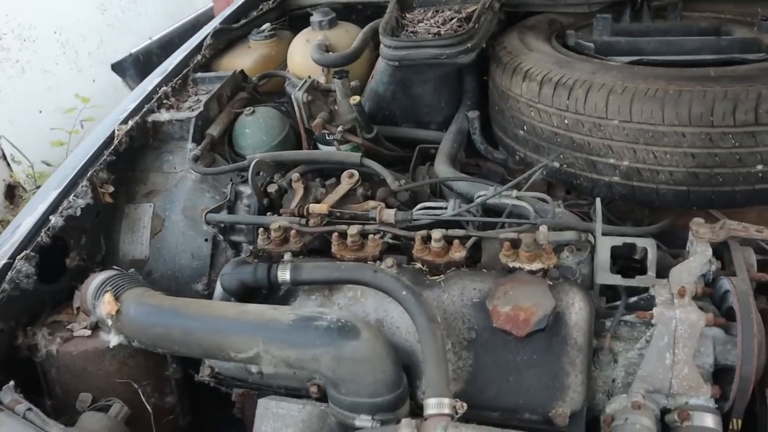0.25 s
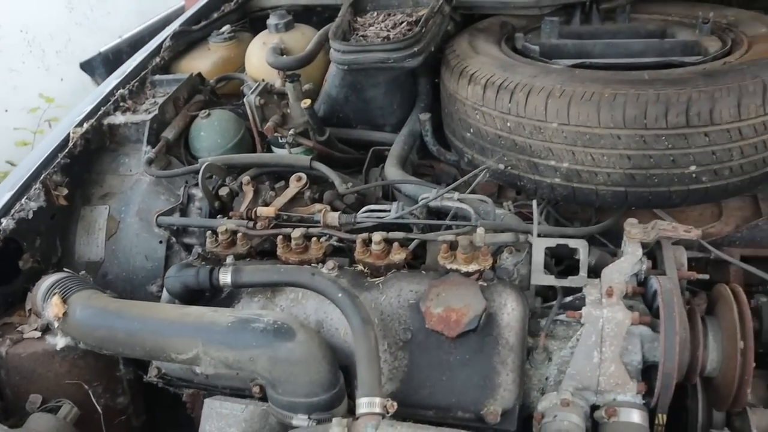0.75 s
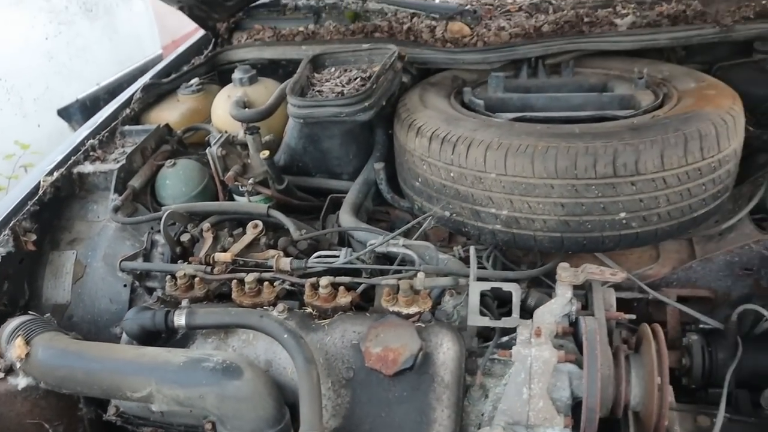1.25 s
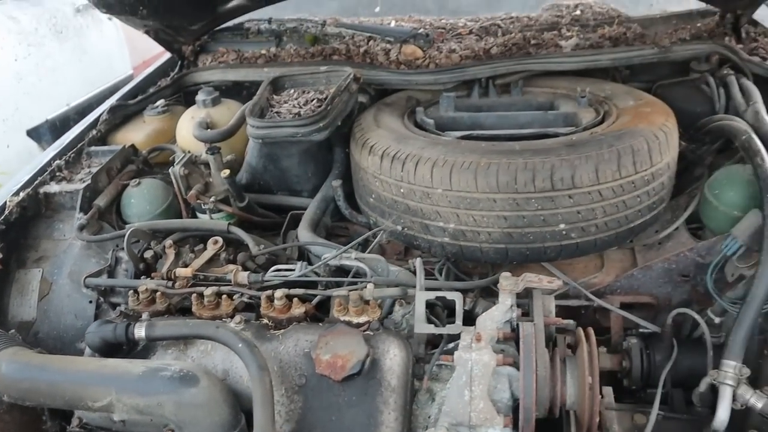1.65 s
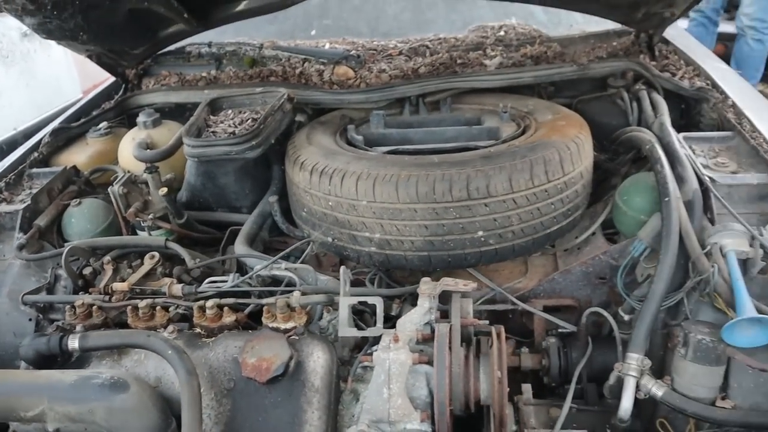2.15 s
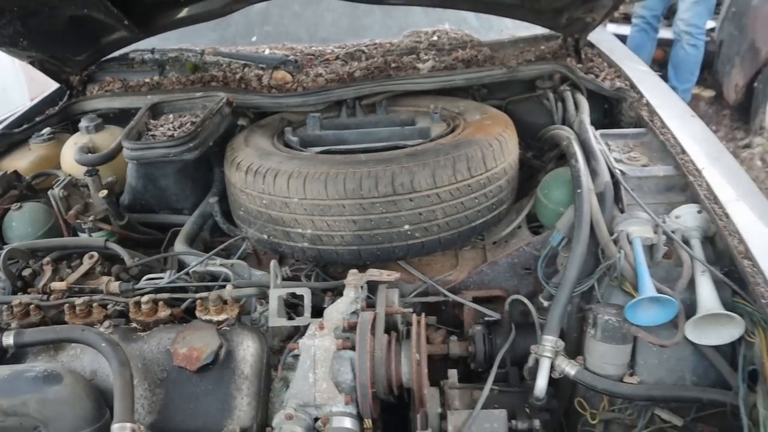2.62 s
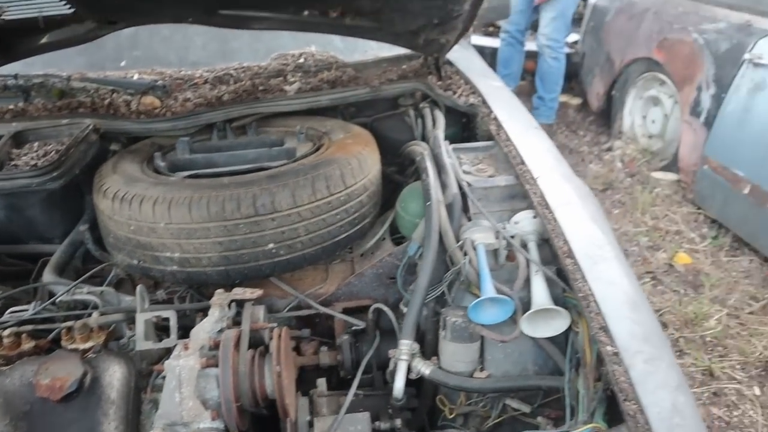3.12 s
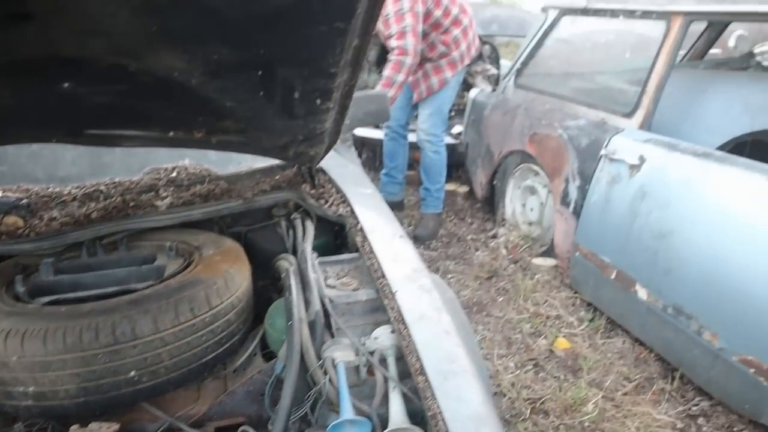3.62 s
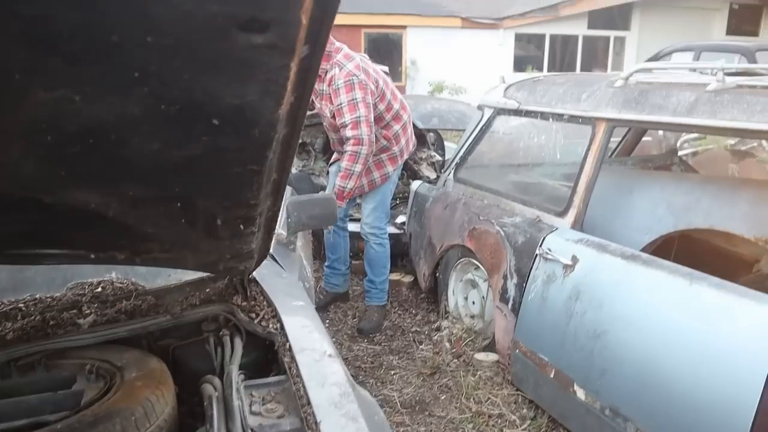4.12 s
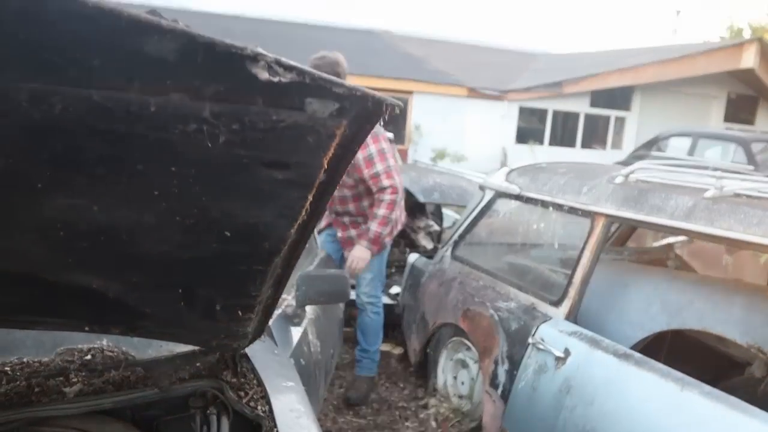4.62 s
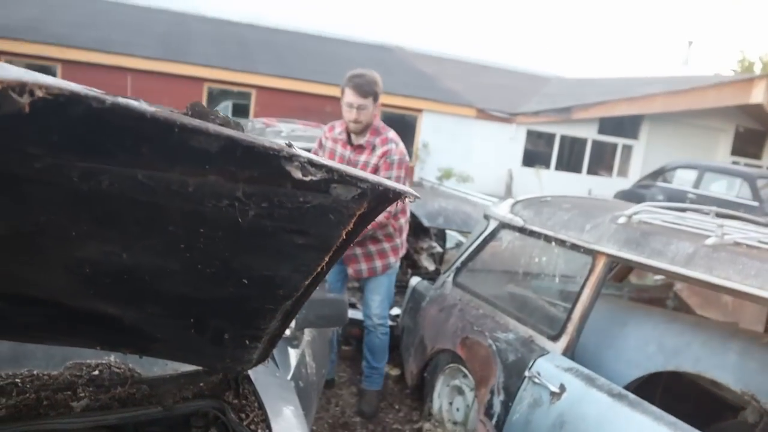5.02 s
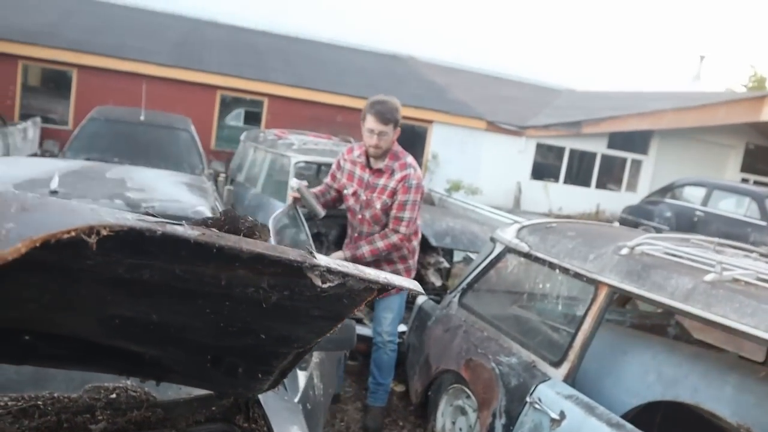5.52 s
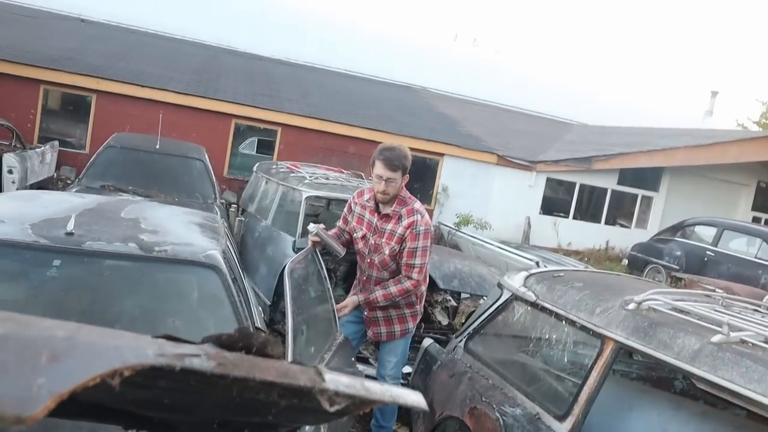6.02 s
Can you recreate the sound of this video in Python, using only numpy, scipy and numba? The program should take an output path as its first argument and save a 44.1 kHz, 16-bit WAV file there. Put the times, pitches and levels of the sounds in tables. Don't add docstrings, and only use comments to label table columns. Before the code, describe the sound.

Uneven bursts of hollow sheet-metal thumps and loose latch clatter, heard at a few metres in an open yard. After the strong opening tugs the contacts become small and quiet, a hinge chirps once, and a distant bird whistles downward. A second rattling boom comes, then dry stalks crunch under a dragging shoe and the door knocks again. Soft distant traffic continues throughout, with the recording level dipping after loud clunks.

```python
import sys
import numpy as np
from scipy import signal
from scipy.fft import rfft, irfft
from scipy.io import wavfile
from scipy.ndimage import uniform_filter1d
from numba import njit

SR = 44100
rng = np.random.default_rng(int(sys.argv[2]) if len(sys.argv) > 2 else 0)


def boost(x):
    u = np.asarray(x, float) / 20
    return 10 ** u


def unload_wav(signal):
    wavfile.write(
        sys.argv[1],
        SR,
        np.round(np.clip(np.atleast_2d(signal).T, -1, 1) * 32767).astype(np.int16),
    )


N = 276066


def band(x, lo_hz, hi_hz):
    edges = np.clip([lo_hz, hi_hz], 20, .45 * SR)
    return signal.lfilter(*signal.butter(2, edges, "band", fs=SR), x + 1e-18)


def ring(x, hz, t60_s):
    radius = np.exp(-np.log(1000) / (max(t60_s, .002) * SR))
    angle = 2 * np.pi * hz / SR
    return signal.lfilter([.5, 0, -.5], [1, -2 * radius * np.cos(angle), radius * radius], x)


def add(out, start_s, sound, peak_db):
    i = int(start_s * SR)
    top = np.sqrt(2 * uniform_filter1d(sound ** 2, size=88).max())
    out[i:i + len(sound)] += (boost(peak_db) / top * sound)[:N - i]


def walk(rate_hz):
    hold = int(SR / rate_hz)
    steps = np.repeat(rng.standard_normal(N // hold + 1), hold)
    return uniform_filter1d(uniform_filter1d(steps, hold), hold)[:N]


def grit(count, spread_db):
    return rng.standard_normal(count) * boost(spread_db * np.minimum(rng.exponential(size=count), 5))


# frequency in Hz, level in dB per Hz.
TOWN_COLOUR = [(12, -31), (22, -2), (49, 0), (119, -6), (520, -11.5), (930, -4), (3270, -26), (15600, -35)]
# frequency in Hz, width in Hz, lift in dB.
ENGINE_DRONES = [(225, 50, 6), (417, 51, 4)]


def town():
    hz = np.maximum(np.fft.rfftfreq(N, 1 / SR), 1)
    colour_hz, colour_db = np.transpose(TOWN_COLOUR)
    colour = boost(np.interp(np.log(hz), np.log(colour_hz), colour_db))
    colour = colour * boost(sum(db * np.exp(-((hz - f) / w) ** 2) for f, w, db in ENGINE_DRONES))
    wide = rfft(rng.standard_normal(N)) * colour
    swell = walk(0.13)
    out = 0
    for octave in np.arange(4, 15):
        share = np.clip(1 - np.abs(np.log2(hz) - octave), 0, 1)
        sway = np.clip(1.3 - octave / 11, 0, 1)
        out = out + irfft(wide * share, N) * boost(sway * (1.5 * swell + 2.5 * walk(5)))
    return out / out.std() * boost(-43)


def whistle(table):
    s, hz, db = np.transpose(table)
    t = np.arange(N) / SR
    level = boost(np.interp(t, s, db, -140, -140) + 6.2 * walk(45))
    pitch_hz = np.interp(t, s, hz) * (1 + 0.00665 * walk(71))
    return np.sqrt(2) * level * np.sin(2 * np.pi * np.cumsum(pitch_hz) / SR)


# time in seconds, pitch in Hz, level in dB.
SQUEAL_GLIDE = [
    (2.69, 11700, -95),
    (2.712, 11960, -64),
    (2.73, 11950, -65),
    (2.77, 11800, -76),
    (2.8, 12080, -72),
    (2.84, 11950, -72),
    (2.865, 11500, -95),
]


def squeal():
    return whistle(SQUEAL_GLIDE)


# time in seconds, pitch in Hz, level in dB.
BIRD_GLIDE = [
    (3.7, 3400, -85),
    (3.74, 3300, -68),
    (3.88, 3180, -65),
    (3.97, 3100, -64),
    (4.04, 2970, -62),
    (4.15, 2930, -66),
    (4.18, 2920, -90),
]


def bird():
    return whistle(BIRD_GLIDE)


# time in seconds, level in dB.
SHOE_PRESSURE = [
    (4.814, -52),
    (4.84, -53.5),
    (4.886, -45.5),
    (5.02, -52.5),
    (5.035, -41.5),
    (5.158, -40.5),
    (5.175, -53),
    (5.43, -63),
    (5.45, -73),
]
# centre in Hz, width in Hz, level in dB.
CRACKLE_BANDS = [(3700, 5500, 6.5), (8160, 1600, 9), (12750, 3400, 4.5)]


def grass():
    s, db = np.transpose(SHOE_PRESSURE)
    first, last = int(s[0] * SR), int(s[-1] * SR)
    crackle = 0
    for hz, width, gain_db in CRACKLE_BANDS:
        layer = band(grit(count=last - first, spread_db=5), hz - width / 2, hz + width / 2)
        crackle = crackle + boost(gain_db) * band(layer, .4 * hz, 1.6 * hz)
    pressure_db = np.interp(np.arange(first, last) / SR, s, db) + 2.7 * walk(70)[first:last]
    out = np.zeros(N)
    out[first:last] = crackle / crackle.std() * boost(pressure_db)
    return out


# start in seconds, peak in dB, pitch in Hz.
STALK_SNAPS = [(0.0576, -43, 7100), (0.1252, -45, 7100), (0.226, -45, 4080), (0.331, -45, 4200),
               (0.358, -48, 4230), (0.3727, -48, 4600), (0.4087, -45.5, 6500), (0.845, -48, 6350),
               (1.483, -52, 9900), (1.552, -40, 7500), (1.559, -37, 9500), (1.572, -35, 13000),
               (3.1077, -45, 5420), (3.14, -50, 7350), (4.777, -40, 8500), (4.836, -36, 13000),
               (4.991, -39, 7910), (5.0959, -39, 8200), (5.1034, -43, 7760), (5.1346, -35, 4160),
               (5.2364, -44, 12500), (5.1536, -31, 13500), (5.153, -40, 8700), (5.3294, -48, 4210),
               (5.9397, -40, 7340), (6.0482, -44, 8500), (6.0643, -42, 5770), (6.1003, -46, 8300),
               (6.1703, -34.5, 7850)]


def snaps():
    out = np.zeros(N)
    for s, db, hz in STALK_SNAPS:
        snap = rng.standard_normal(441) * np.exp(-np.arange(441) / SR / .0006)
        add(out, s, band(band(snap, .8 * hz, 1.3 * hz), .7 * hz, 1.5 * hz), db)
    return out


def yard(x):
    t = np.arange(SR // 2) / SR
    tail = boost(-33.5 - 60 * t / 0.16) * np.minimum(t / 0.037, 1)
    scatter = band(rng.standard_normal(len(t)), 247, 2500) * tail
    return x + signal.fftconvolve(x, scatter)[:N]


# start in seconds, start pitch in Hz, end pitch in Hz, peak in dB,
# length in seconds.
HINGE_SLIPS = [
    (3.193, 2236, 2360, -17.5, 0.021),
    (3.2115, 2380, 2165, -17, 0.0098),
    (3.221, 2225, 1900, -21.5, 0.0093),
]
SLIP_PARTIALS = [3, -15, -16, -28, -31, -36]


def hinge():
    out = np.zeros(N)
    for s, from_hz, to_hz, db, length_s in HINGE_SLIPS:
        u = np.linspace(0, 1, int(length_s * SR))
        phase = 2 * np.pi * np.cumsum(from_hz + (to_hz - from_hz) * u ** 2) / SR
        tone = 0
        for k, partial_db in enumerate(SLIP_PARTIALS):
            softer_db = .4 * k * (db + 16)
            tone = tone + boost(partial_db + softer_db) * np.sin((k + 1) * phase)
        add(out, s, np.sin(np.pi * u) ** 1.3 * tone, db)
    t = np.arange(SR // 2) / SR
    cars = boost(-27 - 60 * t / 0.093) * np.minimum(t / .012, 1)
    wall = boost(-55.5) * np.exp(-((t - .15) / 0.041) ** 2)
    echo = band(rng.standard_normal(len(t)), 1240, 5500) * (cars + wall)
    return out + signal.fftconvolve(out, echo)[:N]


# start in seconds, peak in dB, pitch in Hz.
SKIN_THUMPS = [(0.482, -14.5, 131.5), (0.517, -14.5, 119), (0.547, -11.5, 140.6), (0.6, -20.5, 100),
               (0.704, -15, 151), (0.76, -21, 80), (0.847, -29, 81), (1.076, -13, 244.4),
               (1.161, -23.5, 84.5), (1.499, -31, 130), (1.569, -25, 98), (1.611, -21, 92.5),
               (1.751, -23, 87), (1.801, -28.5, 97), (1.847, -28.5, 82.4), (2.569, -33, 151),
               (2.806, -35, 128), (3.466, -25, 138), (3.51, -27.5, 154), (4.2, -12, 139.5),
               (4.24, -9.5, 129), (4.291, -20, 98), (4.369, -22.5, 110), (4.448, -29.5, 103),
               (4.5, -27, 135), (5.08, -33.5, 151), (5.655, -22, 223), (5.698, -25.5, 75.6),
               (5.881, -40, 210), (6.1, -34.5, 194)]


def booms():
    out, t = np.zeros(N), np.arange(17640) / SR
    for s, db, hz in SKIN_THUMPS:
        shudder = rng.standard_normal(len(t)) * np.minimum(t / 0.0014, 1) * boost(-60 * t / 0.3)
        push = 0.54 * np.exp(-t / 0.0016) + 0.57 * shudder
        skin = ring(push, hz, 0.14)
        skin = skin + .5 * ring(push, 0.696 * hz, 0.096)
        skin = skin + 1.18 * ring(push, 1.596 * hz, 0.061)
        skin = skin + 0.68 * ring(push, 2.297 * hz, 0.06)
        skin = skin + 0.79 * ring(push, 3.36 * hz, 0.019)
        add(out, s, band(band(skin, 50, 700), 35, 900), db)
    return out


def struck(force, modes, top_hz):
    spot = rng.standard_normal((len(modes), 2))
    body = 0
    for (hz, db, t60_s), (louder, sharper) in zip(modes, spot):
        body = body + boost(db + 2.0 * louder) * ring(force, hz * (1 + .03 * sharper), t60_s)
    lowest_hz = modes[0][0]
    return band(band(body, .6 * lowest_hz, top_hz), .4 * lowest_hz, 1.4 * top_hz)


# frequency in Hz, level in dB, t60 in seconds.
LATCH_MODES = [(1718, 1, 0.0041), (1990, 3.5, 0.0087), (2280, -1.5, 0.013), (2630, -8.5, 0.012),
               (2936, 0.5, 0.0081), (3380, -6, 0.013), (3710, -4.5, 0.0056), (4350, -12, 0.01),
               (4810, -12.5, 0.011), (5430, -13.5, 0.0041), (6640, -8, 0.003)]


def clunks(table, shell, rise_s, rattle_s):
    out, t = np.zeros(N), np.arange(6615) / SR
    for s, shell_db, latch_db, crack_db in table:
        chatter = grit(count=len(t), spread_db=2.5)
        settle_s = max(rattle_s * (1 - 0.1113 * shell_db), .005)
        fade = boost(-60 * np.maximum(t - rise_s, 0) / settle_s)
        first_touch = 1 + 0.69 * np.exp(-((t - rise_s) / 0.00045) ** 2)
        force = np.minimum(t / max(rise_s, 2e-4), 1) ** 1.07 * fade * chatter * first_touch
        rattle = np.minimum(t / (rise_s + 0.002), 1) ** 0.91 * fade ** 1.51 * chatter
        crack = rattle * fade ** 0.44 * np.minimum(t / (rise_s + 0.0024), 1)
        crack = band(crack, 5850, 9440) + 0.4 * band(crack * fade ** 0.44, 8800, 13100)
        start_s = s - rise_s / 3
        add(out, start_s, struck(force, shell, 1400), shell_db)
        add(out, start_s, struck(rattle, LATCH_MODES, 6500), shell_db + latch_db)
        add(out, start_s, crack, shell_db + crack_db - 3.5)
    return out


def knocks(table, shell, rise_s, rattle_s):
    out = np.zeros(N)
    for s, shell_db, latch_db, crack_db, tilt_db in table:
        tilted = [(hz, db + tilt_db * np.log2(hz / 750), t60_s) for hz, db, t60_s in shell]
        out += clunks([(s, shell_db, latch_db, crack_db)], tilted, rise_s, rattle_s)
    return out


# frequency in Hz, level in dB, t60 in seconds.
FRAME_MODES = [(267, -4, 0.028), (347, -5, 0.03), (441, 3, 0.043), (529, -3, 0.011), (660, 0, 0.011),
               (759, -5, 0.021), (930, 2.5, 0.016), (1100, -11.5, 0.024), (1300, 1, 0.0099),
               (1520, -10, 0.019)]


def slack(table, rise_s, rattle_s):
    out = np.zeros(N)
    for s, shell_db, pitch_hz in table:
        near = [(hz, db - 15 * np.log2(hz / pitch_hz) ** 2, t60_s) for hz, db, t60_s in FRAME_MODES]
        out += clunks([(s, shell_db, -17, -30)], near, rise_s, rattle_s)
    return out


# start in seconds, body ring in dB,
# pitch of the struck part in Hz.
SLACK_NUDGES = [(1.649, -38, 700), (1.699, -45, 700), (1.901, -37, 800), (2.467, -34.5, 387),
                (2.56, -39, 400), (2.59, -46, 420), (2.902, -38, 1100), (2.987, -28.5, 780),
                (3.007, -33.5, 380), (3.038, -38, 450), (3.259, -35, 402), (3.362, -34.5, 350),
                (3.85, -38.5, 400)]


def nudges():
    return slack(SLACK_NUDGES, rise_s=.0086, rattle_s=0.035)


# start in seconds, body ring in dB, pitch of the struck part in Hz.
SLACK_TAPS = [
    (1.493, -37, 1010),
    (2.411, -29.5, 1300),
    (2.43, -33, 1080),
    (2.794, -30, 820),
    (2.826, -30, 450),
    (3.499, -29, 1400),
]


def taps():
    return slack(SLACK_TAPS, rise_s=0.00204, rattle_s=0.033)


# frequency in Hz, level in dB, t60 in seconds.
DOOR_MODES = [(327, -22.5, 0.032), (456, -8, 0.072), (493, -3, 0.041), (610, -10, 0.049), (693, 8.5, 0.018),
              (754, -3, 0.056), (846, -2, 0.055), (974, -6, .035), (1094, -9.5, 0.052), (1270, -9, 0.022),
              (1440, -14, .02), (1600, -15, 0.016)]
# start in seconds, body ring in dB, latch ring relative in dB,
# crack relative in dB, brightness of the struck spot in dB per octave.
SEAL_REBOUNDS = [
    (1.115, -7, -21.5, -25.5, 6.3),
    (5.038, -14, -14.5, -37, .1),
    (5.671, -5.5, -13, -19.5, .1),
    (5.719, -28, -19, -21, .1),
]


def rebounds():
    return knocks(SEAL_REBOUNDS, DOOR_MODES, rise_s=0.00647, rattle_s=0.05)


# start in seconds, body ring in dB, latch ring relative in dB,
# crack relative in dB, brightness of the struck spot in dB per octave.
DOOR_KNOCKS = [(0.483, -19.5, -38, -25.5, -1), (1.014, -23, -11.5, -30, 5), (1.075, 1, -15, -36, 6),
               (1.085, -3, -19, -30, 3), (1.104, -5.5, -19.5, -38, 9), (1.75, -33.5, -26, -32, 9),
               (4.201, -12, -29, -37, -16), (4.887, -20.5, -27, -26, -6), (4.98, -33.5, -13, -14, -16),
               (5.029, -8.5, -17, -47, -6), (5.568, -15.5, -17.5, -40, 15.5), (5.655, -2, -31, -40, -4.5),
               (5.694, -21, -26, -23, 5), (6.194, -20.5, -19.5, -32, -6), (6.25, -4.5, -16, -20.5, -14)]


def door_knocks():
    return knocks(DOOR_KNOCKS, DOOR_MODES, rise_s=.0021, rattle_s=0.054)


# start in seconds, body ring in dB, latch ring relative in dB,
# crack relative in dB.
PART_SCRAPES = [(0.532, -24.5, 4.5, -1.5), (0.564, -25, -15, -18), (0.655, -24, -5.5, -11),
                (0.729, -15, -22, -20), (1.631, -27.5, -12, -17), (2.012, -37.5, -6, -14),
                (3.548, -40.5, -9, -7), (4.224, -20, -21, -19), (4.241, -20, -3, -32),
                (4.269, -15, -19, -15), (4.294, -22.5, -7.5, -13.5), (4.324, -24.5, -15, -16),
                (4.384, -23, -15, -20), (4.444, -29, -17, -18), (4.569, -31.5, -16, -40)]


def scrapes():
    return clunks(PART_SCRAPES, FRAME_MODES, rise_s=.009, rattle_s=0.049)


# start in seconds, body ring in dB, latch ring relative in dB,
# crack relative in dB, brightness of the struck spot in dB per octave.
LATCH_BLOWS = [(0.636, -29, -11, -11, -2), (0.705, -4, -15, -11, 7), (0.711, -10.5, -5, -35, -6),
               (0.77, -13, -10, -7.5, 6), (1.588, -21, -3.5, -6.5, 2), (1.62, -17, 5.5, -1, 0),
               (2.449, -34.5, -10, -8.5, 13), (4.036, -35.5, -6, -9.5, 0), (4.253, -12, 1.5, -7.5, -8),
               (4.351, -22.5, -6.5, -22, -2), (4.373, -19, -1.5, -11.5, -1.5), (4.543, -23, -14, -27, -1)]


def latch_blows():
    return knocks(LATCH_BLOWS, FRAME_MODES, rise_s=.0023, rattle_s=0.035)


def scene():
    around = town() + squeal() + bird() + grass() + snaps()
    door = booms() + rebounds() + door_knocks()
    latch = nudges() + taps() + scrapes() + latch_blows()
    return (around + yard(hinge() + door + latch))[None]


@njit
def follow(x, attack, release):
    level, out = 0., np.empty(len(x))
    for i in range(len(x)):
        level += (abs(x[i]) - level) * (attack if abs(x[i]) > level else release)
        out[i] = level
    return out


def top_cut(x):
    return signal.sosfilt(signal.butter(12, 15720, fs=SR, output="sos"), x)


def record(dry):
    attack_s, release_s = 0.06, .3
    loud = follow(dry[0], 1 / (attack_s * SR), 1 / (release_s * SR))
    ducked = dry * (1 + loud / boost(-19)) ** -.35
    return top_cut(np.clip(ducked, -1, 1))


dry = scene()
out = record(dry)
unload_wav(out)
```